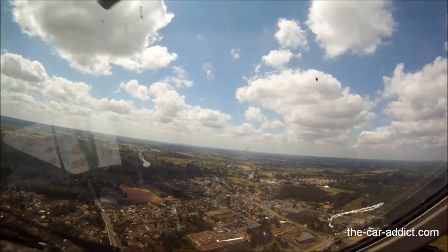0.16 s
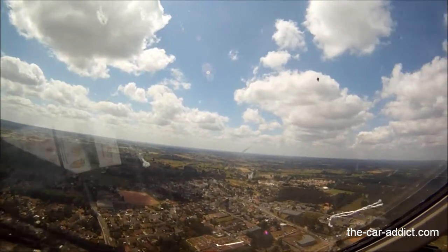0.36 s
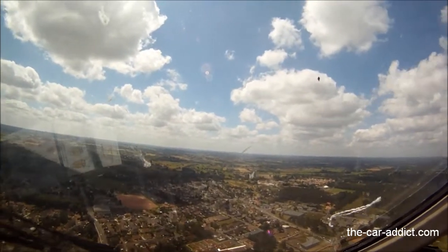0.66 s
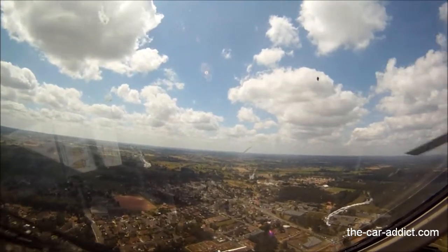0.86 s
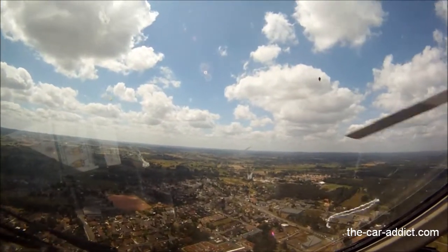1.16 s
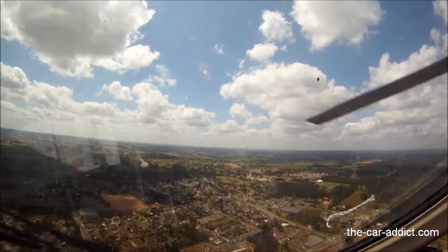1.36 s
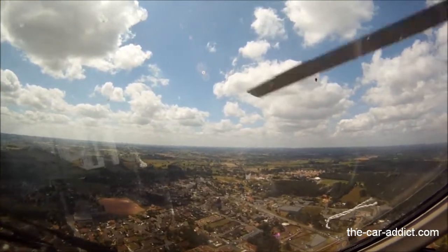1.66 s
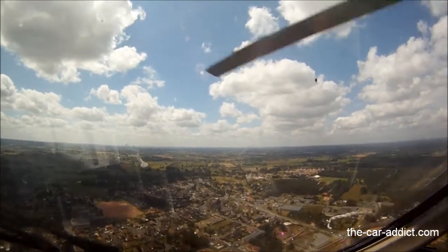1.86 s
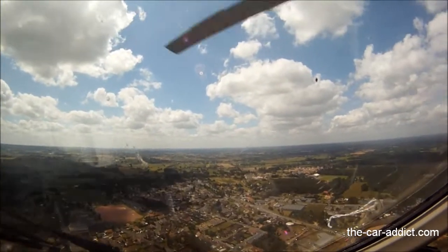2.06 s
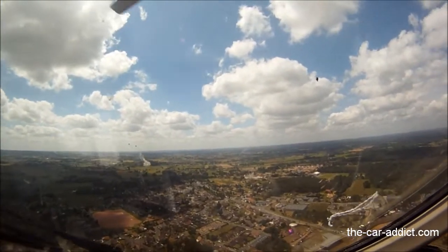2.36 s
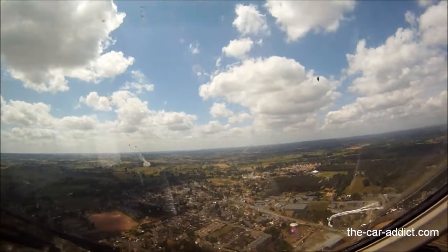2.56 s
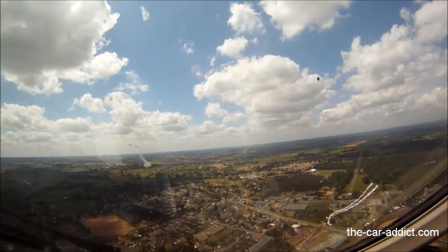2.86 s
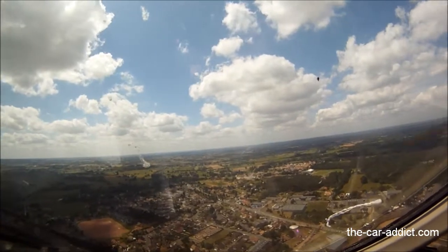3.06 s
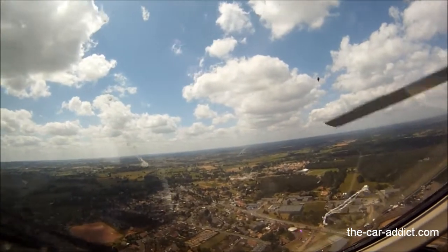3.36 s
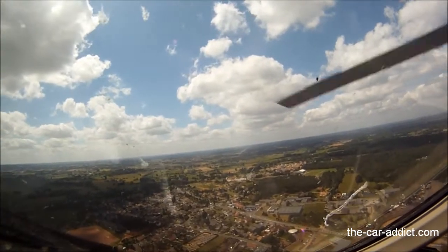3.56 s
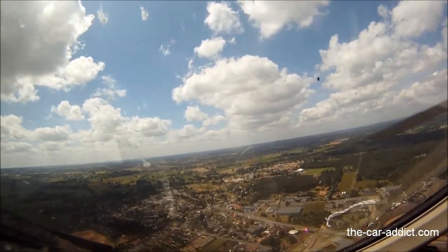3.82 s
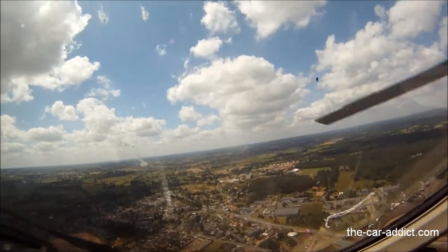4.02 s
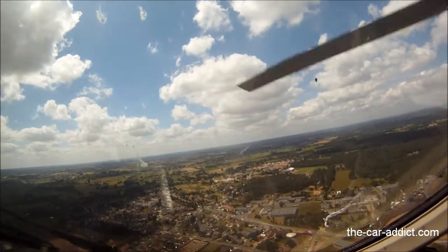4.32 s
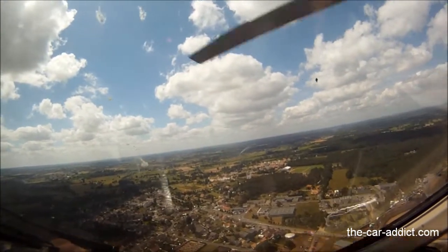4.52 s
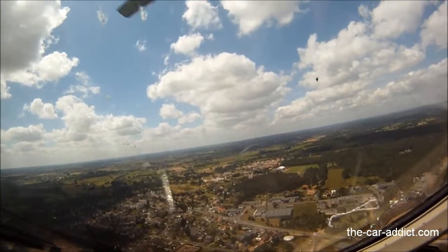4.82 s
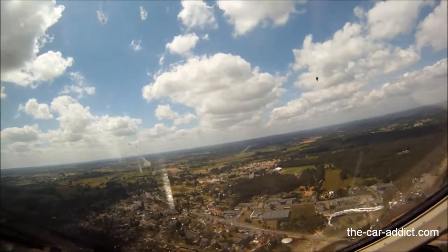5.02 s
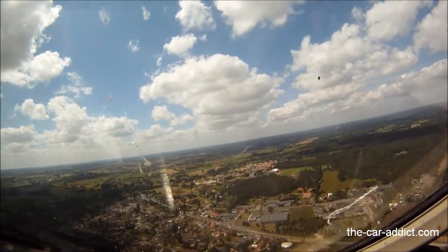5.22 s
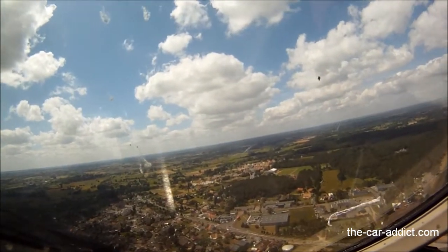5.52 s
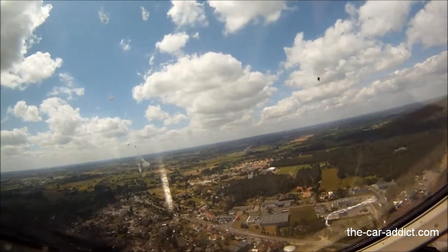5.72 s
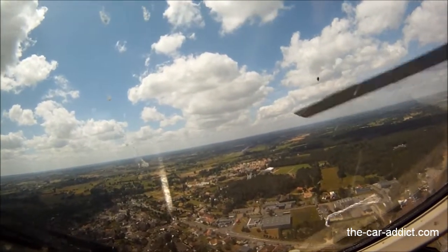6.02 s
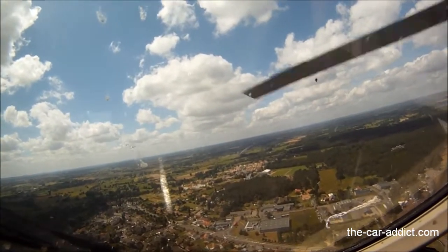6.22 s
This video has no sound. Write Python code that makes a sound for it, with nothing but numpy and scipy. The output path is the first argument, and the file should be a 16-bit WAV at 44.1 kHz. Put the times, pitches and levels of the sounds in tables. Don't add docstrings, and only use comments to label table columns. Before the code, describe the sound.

Inside a light helicopter in steady flight, low fixed hums from main rotor, tail rotor and drive shaft merge with a dense, bassy roar of air. The rotor throbs rapidly, about twenty beats a second. Irregular dull pressure thumps bump the cabin, each making the small camera microphone dip and recover. Panels ring and flutter, gears whine very faintly, and a gritty low-quality treble edge covers everything.

```python
import sys
import numpy as np
from scipy import signal
from scipy.fft import rfft, irfft
from scipy.io import wavfile
from scipy.ndimage import uniform_filter1d

SR = 44100
rng = np.random.default_rng(int(sys.argv[2]) if len(sys.argv) > 2 else 0)


def volts_from_decibels(level):
    exponent = np.asarray(level, float) / 20
    return 10 ** exponent


def master(y):
    cut = np.clip(np.atleast_2d(y).T, -1, 1)
    pcm = np.round(cut * 32767)
    wavfile.write(sys.argv[1], SR, pcm.astype(np.int16))


N = 281358

# (t/s, tail blade passes per second/Hz)
SPEED = [
    (0, 69.15),
    (2, 69.0),
    (3.3, 68.8),
    (4.7, 68.6),
    (5.4, 68.75),
    (6.38, 69.1),
]
# (t/s, direction of push, gain drop/dB)
SURGES = [(0.062, 1, 4), (0.19, -1, 4.5), (0.406, -1, 2.5), (0.557, 1, 3.5), (0.83, 1, 3.5), (1.006, -1, 4),
          (1.382, 1, 2), (1.491, -1, 3), (1.794, -1, 2.5), (1.888, 1, 2.5), (2.453, 1, 3.5),
          (2.553, 1, 2.5), (2.728, 1, 4), (2.824, -1, 5), (3.03, -1, 3), (3.325, 1, 5), (3.597, -1, 2.5),
          (3.702, 1, 0.5), (4.265, -1, 2), (4.664, 1, 3), (4.961, 1, 2), (5.072, 1, 4), (5.454, 1, 5),
          (5.914, 1, 3.5)]
MAIN_GEAR = .2831


def evened(x):
    return x / np.sqrt(np.mean(x ** 2) + 1e-20)


def curve(rows):
    return np.interp(np.arange(N) / SR, *np.transpose(rows))


def drift(rate_hz):
    spectrum = rfft(rng.standard_normal(N))
    hz = np.fft.rfftfreq(N, 1 / SR)
    return evened(irfft(spectrum / (1 + (hz / rate_hz) ** 2), N))


def resonate(x, hz, width_hz):
    turn = np.exp(2j * np.pi * hz * np.arange(N) / SR)
    r = np.exp(-np.pi * width_hz / SR)
    return (turn * signal.lfilter([1 - r], [1, -r], x / turn)).real


def turns_of(gearing):
    return gearing * np.cumsum(curve(SPEED)) / SR


def hum(gearing, orders, waver_db):
    turns = turns_of(gearing)
    total = np.zeros(N)
    for multiple, db in orders:
        level = np.sqrt(2) * volts_from_decibels(db + waver_db * drift(1.5))
        total += level * np.cos(2 * np.pi * (round(multiple) * turns + rng.random()))
    return total


def main_rotor():
    # (multiple of the blade rate, level/dB rms)
    main_orders = [(1, -33.8), (2, -28.5), (3, -34.5), (4, -38), (5, -40), (6, -38), (8, -43), (10, -40),
                   (11, -44)]
    return hum(MAIN_GEAR, main_orders, .7)


def tail_rotor():
    # (multiple of the blade rate, level/dB rms)
    tail_orders = [(1, -22.4), (2, -22.3), (3, -34.5), (4, -39.5)]
    return hum(1, tail_orders, .4)


def drive_shaft():
    # (multiple of the shaft rate, level/dB rms)
    shaft_orders = [(1, -25.5)]
    return hum(1.4655, shaft_orders, .9)


def roar():
    # (f/Hz, level/dB per Hz)
    roar_colour = [(14, -32), (30, -7), (65, -4.5), (150, -3.5), (280, -11.5), (450, -6.5), (620, -13.5),
                   (1000, -29), (1500, -29.5), (2500, -30), (3500, -37), (5000, -42), (5500, -47.5),
                   (6000, -46)]
    # (f/Hz, width/Hz, lift/dB)
    cabin_modes = [(85, 13, 1), (122, 17.4, -3.5), (230.5, 9.5, 3.5), (382, 10, 2.5), (638, 27, -2),
                   (723, 15, 3.5), (1070, 74, 2), (1260, 50, 0), (1406, 28, 3), (1500, 65, -2),
                   (1695, 63, 3), (1940, 42, 2), (2510, 100, -2.5), (2660, 50, 0.5), (3215, 64, 7),
                   (3570, 50, -0.5), (3900, 36, -4.5), (3934, 61, 6.5), (4300, 100, 0), (4720, 230, 3),
                   (5230, 80, 3)]
    count, hz = N // 512 + 5, np.fft.rfftfreq(2048, 1 / SR)
    real, imaginary, patches = rng.standard_normal((count, 1025, 3)).T
    patches = uniform_filter1d(patches, size=20, axis=0)
    patches_db = 0.6 * evened(uniform_filter1d(patches, size=5, axis=1))
    f, db = np.transpose(roar_colour)
    shape_db = np.interp(np.log(hz + 1), np.log(f + 1), db, right=-70)
    for mode_hz, width_hz, lift_db in cabin_modes:
        shape_db += lift_db * np.exp(-.5 * ((hz - mode_hz) / width_hz) ** 2)
    gust_share = np.clip(hz / 1100 - .3, 0, 1)[:, None]
    gusts = np.interp(np.arange(count) * 512, np.arange(N), gust_db())
    spectrum = (real + 1j * imaginary) * volts_from_decibels(shape_db[:, None] + patches_db + gust_share * gusts)
    noise = signal.istft(spectrum, nperseg=2048, noverlap=1536)[1][:N]
    return volts_from_decibels(-20) * evened(noise)


def gust_db():
    # (t/s, strength/dB)
    gusts = [(0, 1), (.95, -0.5), (1.32, 0), (1.9, -.6), (2.2, -0.8), (2.5, -1), (2.72, 1.5), (3.4, -1.5),
             (4.05, 0), (4.9, -0.5), (5.2, -1.5), (6.38, 0)]
    return curve(gusts) - np.mean(np.transpose(gusts)[1])


def panels():
    # (f/Hz, width/Hz, level/dB rms, flutter/dB)
    panel_modes = [
        (430.6, 125, -31, 1.3),
        (541.7, 93, -31, -1.1),
        (2136, 250, -46, 1.5),
        (3011, 135, -42.5, 2),
        (2830, 640, -42, 0),
    ]
    total = np.zeros(N)
    for hz, width_hz, db, flutter_db in panel_modes:
        ring = resonate(rng.standard_normal(N), hz, width_hz)
        ring = evened(resonate(ring, hz, width_hz))
        total += volts_from_decibels(db + flutter_db * drift(11) + gust_db() * (hz > 1000)) * ring
    return total


def surges():
    t = np.arange(-800, 801) / SR
    swing = .65 * np.cos(2 * np.pi * 105 * t) + .35 * np.cos(2 * np.pi * 460 * t)
    push = np.exp(-.5 * (t / .0035) ** 2) * swing
    train = np.zeros(N)
    for s, sign, drop_db in SURGES:
        train[round(s * SR)] = np.sign(sign) * volts_from_decibels(-14.5 + drop_db)
    return signal.oaconvolve(train, push, "same")


def gear_whine():
    # (multiple of the rotation, level/dB rms)
    whine_orders = [
        (13, -55),
        (45, -61),
    ]
    return hum(1.449, whine_orders[:1], 1.5) + hum(1.4695, whine_orders[1:], 1.2)


def duck_db():
    attack_s, recover_s = 0.0027, 0.081
    t, total_db = np.arange(N) / SR, np.zeros(N)
    for s, _, drop_db in SURGES:
        after = np.maximum(t - s, 0)
        total_db += max(drop_db, 0) * (1 - np.exp(-after / attack_s)) * np.exp(-after / recover_s)
    return total_db


def scene():
    swell_db = .6 * uniform_filter1d(duck_db(), size=3000)
    beat_db = 0.45 * np.cos(2 * np.pi * (turns_of(MAIN_GEAR) + 0.21))
    airflow = volts_from_decibels(beat_db) * (roar() + panels())
    low = signal.lfilter(*signal.butter(2, 700, fs=SR), airflow)
    airflow = airflow + (volts_from_decibels(swell_db) - 1) * low
    hums = volts_from_decibels(swell_db - .9) * (main_rotor() + tail_rotor() + drive_shaft())
    return (hums + airflow + surges() + gear_whine())[None]


def band_limit(x):
    return signal.sosfilt(signal.butter(12, 15310, fs=SR, output="sos"), x)


def record(dry):
    hunting_db = 0.72 * drift(18)
    ceiling = 3
    levelled = dry[0] * volts_from_decibels(1.2 + hunting_db - duck_db())
    levelled = np.tanh(levelled / ceiling) * ceiling
    stored = signal.resample_poly(levelled, 40, 147)
    held = np.repeat(stored, 4)
    held = signal.resample_poly(held, 147, 160)[:N]
    held = np.pad(held, (0, N - len(held)))
    top_cut = signal.firwin(1023, 15500, window=("kaiser", 9), fs=SR)
    mix = signal.oaconvolve(held, top_cut, "same")
    return band_limit(mix[None])


dry = scene()
out = record(dry)
master(out)
```